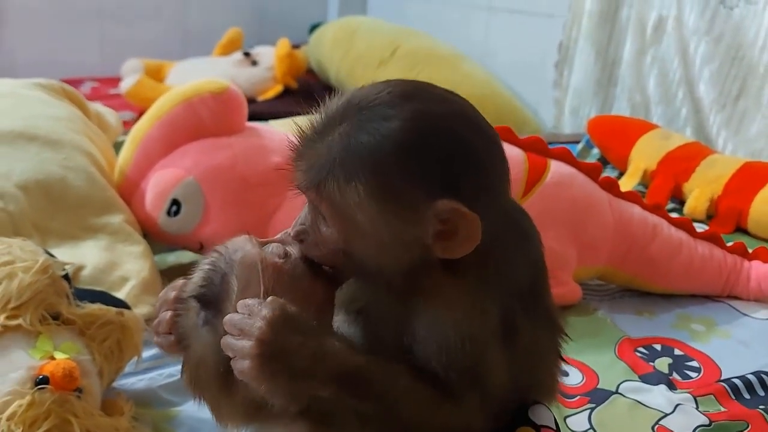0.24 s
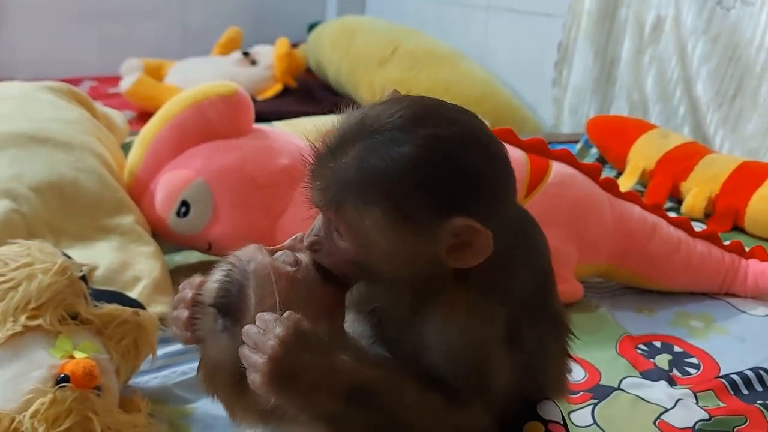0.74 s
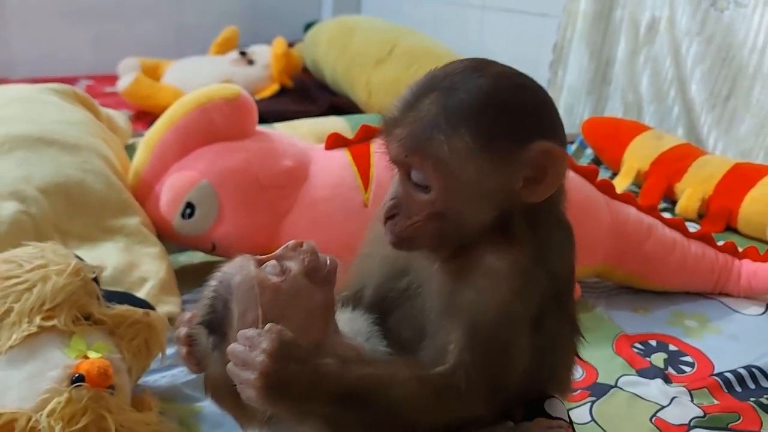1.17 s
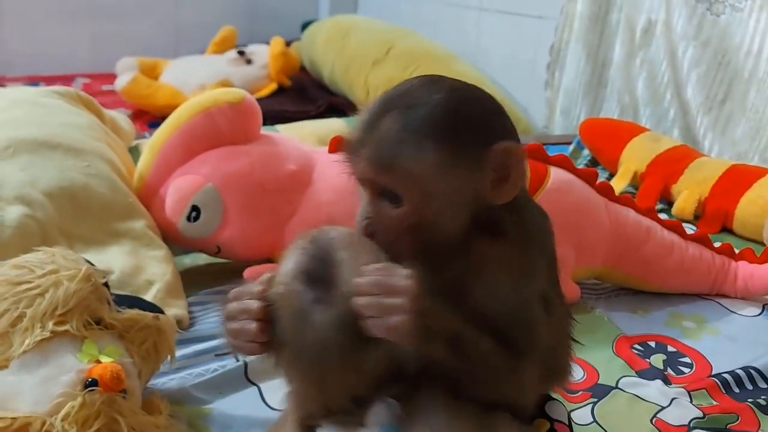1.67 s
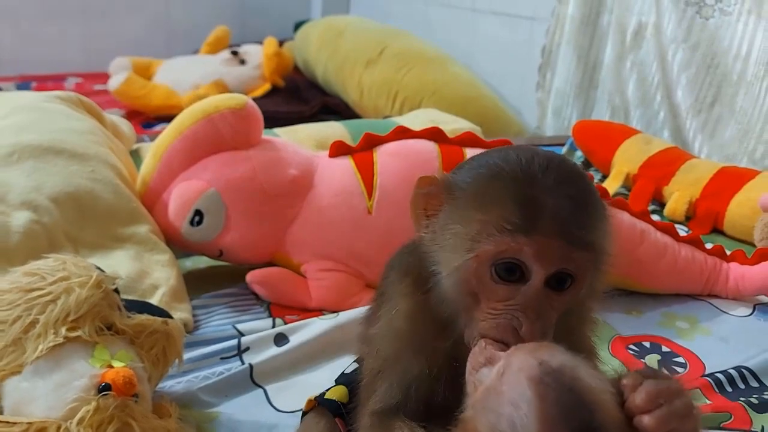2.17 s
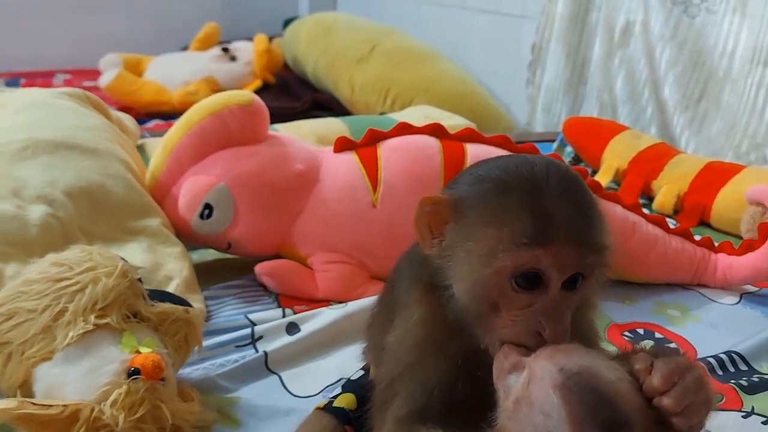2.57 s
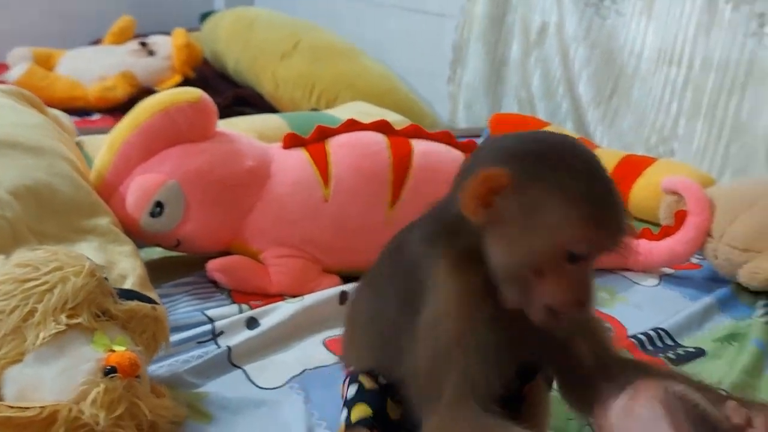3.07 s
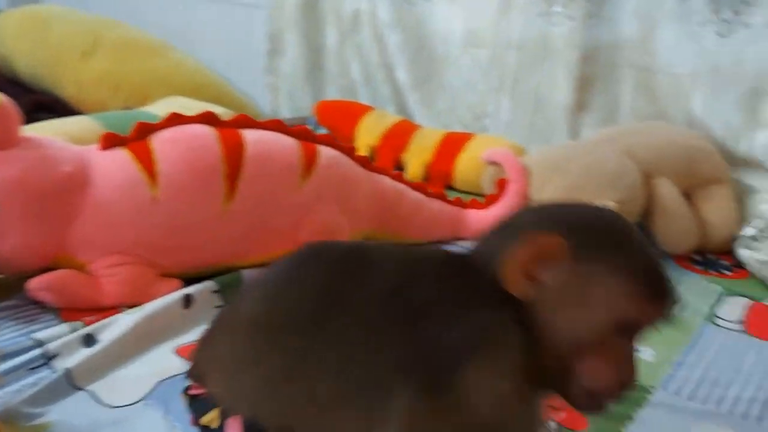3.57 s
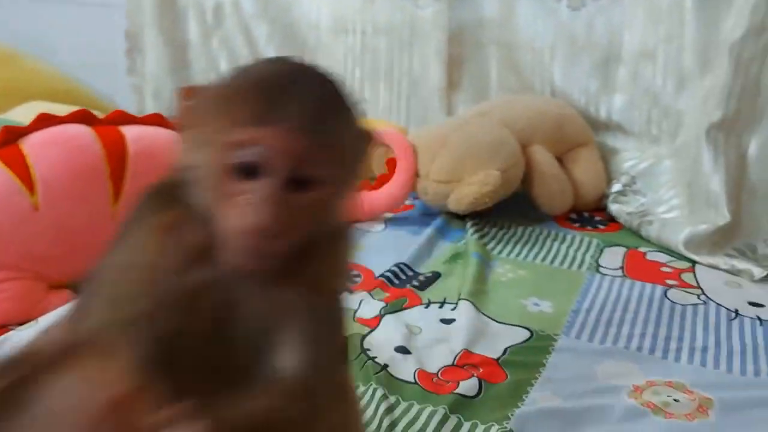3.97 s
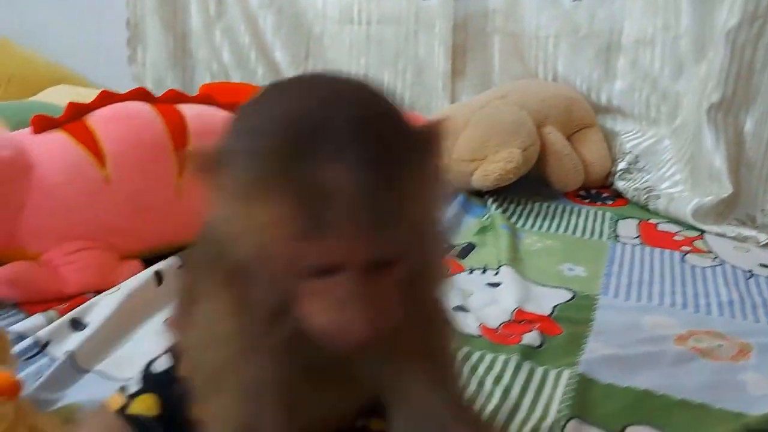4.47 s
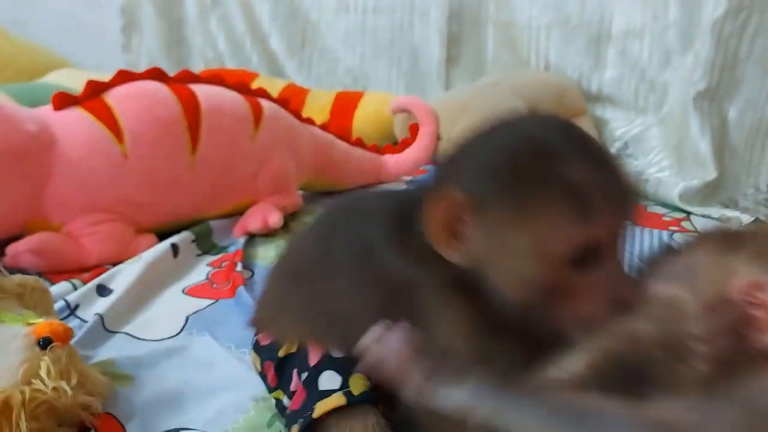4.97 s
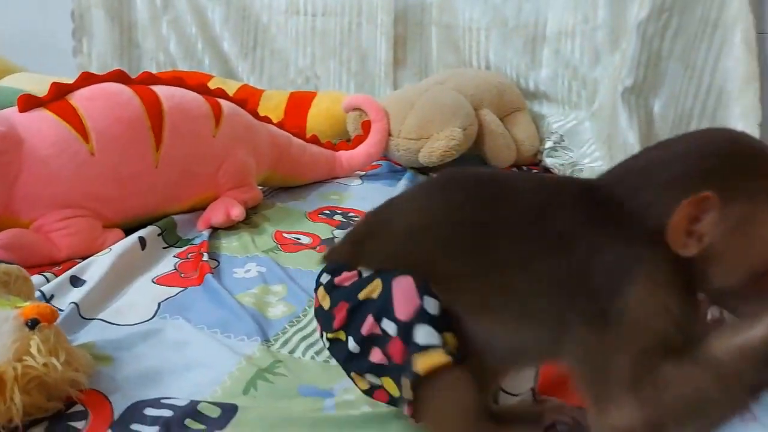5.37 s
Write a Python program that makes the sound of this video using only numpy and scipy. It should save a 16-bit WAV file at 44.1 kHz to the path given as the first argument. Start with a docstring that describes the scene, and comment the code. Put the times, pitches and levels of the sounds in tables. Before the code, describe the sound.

A small monkey scrambles on soft bedding: low, quickly dying thumps, fine cloth rustle and brief fur brushes over steady quiet air noise. Six separate piercing squeaks, gliding and breaking into rasp, appear from the middle onward, strongest near the end. Close stereo pickup in a small room; the left is bright and airy with short reflections, the right is dull and bass-heavy from the bed.

```python
"""Baby monkey on a bed

Small room, the camera resting on the mattress. A baby monkey gives six short, very high squeaks:
a few harmonics on clean gliding arcs that break into rasp, made by shaken pitch and bands of noise.
As it shifts about, coloured noise makes the rustle of cloth, and falling, decaying tones make the
thumps of hands and feet. The left microphone hears the air, with weak bounces and a short room tail;
the right one is muffled and picks up mainly the shaking bed. Each gets a trace of the other's sound."""
import sys
import numpy as np
from scipy import signal
from scipy.fft import rfft, irfft, next_fast_len
from scipy.io import wavfile
from scipy.ndimage import map_coordinates

SR = 44100
rng = np.random.default_rng(int(sys.argv[2]) if len(sys.argv) > 2 else 0)


def log_audio(samples):
    """Write samples as a 16-bit WAV file to the path given in sys.argv[1]."""
    # one column per channel
    frames = np.atleast_2d(samples).T
    # limit to full scale, then quantise
    limited = np.clip(frames, -1, 1)
    pcm = np.round(limited * 32767).astype(np.int16)
    wavfile.write(sys.argv[1], SR, pcm)


N = 247842  # length [samples]
TIME = np.arange(N) / SR


def amp(db):
    """Decibels to gain."""
    return 10 ** (np.asarray(db) / 20)


def unit(x):
    """Scale to rms 1."""
    return x / np.sqrt(np.mean(x ** 2) + 1e-20)


def along(points, hz, column=1):
    """One column of a table over frequency, on a log axis."""
    columns = np.transpose(points)
    return np.interp(np.log(hz + 1), np.log(columns[0] + 1), columns[column])


def level_over_time(rows):
    """Straight lines between the rows of a (time [s], level [dB]) table."""
    times, levels = np.transpose(rows)
    return np.interp(TIME, times, levels)


def wobble(rate, size):
    """A smooth random curve, rate knots a second."""
    knots = rng.standard_normal(int(size * rate / SR) + 4)
    return map_coordinates(knots, [np.arange(size) * rate / SR])


def filtered(x, response):
    """x times a response of frequency."""
    padded_size = next_fast_len(N + SR // 2)
    gain = response(np.fft.rfftfreq(padded_size, 1 / SR))
    return irfft(rfft(x, padded_size) * gain, padded_size)[..., :N]


def shaped(x, points):
    """x through a (frequency [Hz], gain [dB]) table."""
    return filtered(x, lambda hz: amp(along(points, hz)))


def noise(spectrum):
    """Coloured noise of rms 1."""
    return unit(shaped(rng.standard_normal(N), spectrum))


def add(track, s, x):
    """Mix x into the track at s seconds."""
    part = track[round(s * SR):][:len(x)]
    part += x[:len(part)]


def arch(length, roundness=0.27):
    """Progress 0-1 through a short sound, and its rounded swell."""
    u = np.linspace(0, 1, max(round(length * SR), 8))
    return u, np.abs(np.sin(np.pi * u)) ** roundness


# soft rush of the room, before soft_db: (time [s], level [dB])
ROOM_RUSH = [(0.0, -54), (1.69, -53), (2.08, -51.5), (2.47, -51.5), (2.6, -50), (3.88, -50), (4.98, -53.5),
             (5.62, -54)]
# fine rustle of the sheet, before fine_db: (time [s], level [dB])
CLOTH_RUSTLE = [(0.0, -76), (1.52, -66), (1.71, -67.5), (2.8, -71.5), (3.22, -63.5), (3.57, -66),
                (3.88, -64.5), (4.41, -65.5), (4.54, -72), (5.62, -71.5)]
# colour of the rush: (frequency [Hz], relative level [dB])
AIR_COLOUR = [(20, -1), (45, 3.5), (170, 2), (280, 8), (450, 2), (700, 0.5), (1800, 1), (2800, -5.5),
              (4500, -18), (7000, -28), (14000, -52), (17000, -42)]
# fine hiss of fibres, in the sheet and in fur: (frequency [Hz], relative level [dB])
FIBRE_COLOUR = [(1500, -36), (4500, -10.5), (6000, -12.5), (8200, -5.5), (9300, 8), (11500, 3.5),
                (13500, -1), (16000, -16.5)]


def bedding(soft_db=8.0, fine_db=6):
    """The soft rush of the room and the fine rustle of the sheet, as two slowly varying noises."""
    rush_db = level_over_time(ROOM_RUSH) + soft_db + 0.4 * wobble(21, N)
    rustle_db = level_over_time(CLOTH_RUSTLE) + fine_db
    rustle_db = rustle_db + 0.6 * wobble(40, N) + 1.0 * wobble(500, N)
    return amp(rush_db) * noise(AIR_COLOUR) + amp(rustle_db) * noise(FIBRE_COLOUR)


BED_HZ = 64  # the slow ring of the mattress
# mattress shaken by shifting weight, before shake_db: (time [s], level [dB])
WEIGHT_SHIFTS = [(0.0, -55), (0.74, -53.5), (0.85, -57.5), (2.3, -54.5), (2.64, -47), (2.91, -47),
                 (3.19, -38.5), (3.71, -42), (4.18, -40.5), (4.68, -42), (4.79, -54.5), (5.23, -42),
                 (5.4, -48), (5.62, -52)]
# colour of that shaking: (frequency [Hz], relative level [dB])
SHAKE_COLOUR = [(15, -19), (30, -9), (45, 2), (62, 6), (108, -2), (170, -10), (280, -26.5), (450, -33.5),
                (700, -49.5), (1500, -61), (4000, -72)]
# hands and feet on the mattress; a limb that stays down damps the ring:
# (time [s], level before padding [dB], first pitch [Hz], 60 dB decay time [s])
LIMB_THUMPS = [(1.137, -28.5, 396, 0.11), (1.157, -26, 450, 0.11), (1.195, -14, 110, 0.1),
               (1.755, -16.5, 215, 0.082), (2.480, -20.5, 203, 0.088), (2.55, -13.5, 121, .17),
               (2.626, -7, 152, 0.038), (2.665, -13.5, 400, 0.043), (2.686, -12, 295, 0.036),
               (3.007, -10, 334, 0.11), (3.061, -5.5, 175, 0.11), (3.209, -14.5, 220, 0.034),
               (3.233, -13.5, 348, 0.036), (3.296, -14, 306, 0.098), (3.386, -18, 420, 0.052),
               (3.456, -10, 130, 0.043), (3.629, -9.5, 120, 0.07), (3.936, -14.5, 130, .04),
               (3.981, -13, 356, .03), (4.006, -10.5, 181, 0.061), (4.09, -9, 346, 0.04),
               (4.169, -7, 352, 0.064), (4.198, -11, 384, 0.061), (4.373, -16.5, 111, 0.17),
               (4.455, -19, 90.5, 0.19), (4.799, -9, 262, 0.2), (4.834, -6.5, 226, .14),
               (4.968, -13.5, 198, 0.028), (5.077, -19.5, 450, 0.035), (5.089, -7.5, 190, 0.13),
               (5.156, -9.5, 320, 0.17), (5.207, -9, 130, 0.049), (5.3, -11.5, 376, 0.096)]
# the soft mattress colours each blow: (frequency [Hz], gain [dB])
PADDING_GAIN = [(100, 1), (200, -3), (320, 1.5), (450, -3), (700, -6), (2000, 3.5)]


def mattress(glide_s=0.0034, rise_cycles=0.74, shake_db=8.0):
    """Fast ripples arrive first, so each thump falls to the bed's slow ring; shifting weight shakes it."""
    thumps = np.zeros(N)
    t = np.arange(SR // 4) / SR
    for s, db, first_hz, t60 in LIMB_THUMPS:
        pitch = BED_HZ + (first_hz - BED_HZ) * np.exp(-t / glide_s)
        rise = 1 - np.exp(-t * first_hz / rise_cycles)
        decay = amp(db - 60 * t / t60)
        add(thumps, s, -rise * decay * np.sin(2 * np.pi * np.cumsum(pitch) / SR))
    shaking_db = level_over_time(WEIGHT_SHIFTS) + shake_db + wobble(23, N)
    return shaped(thumps, PADDING_GAIN) + amp(shaking_db) * noise(SHAKE_COLOUR)


# brief brushes of fur and cloth, and the monkey's short hissy puffs near 1.86 and 2.07 s, dry: # (time [s],
# length [s], fine level [dB], coarse level [dB])
BRUSHES_AND_PUFFS = [(.852, .0054, -51, -62), (1.143, 0.0064, -50, -60), (1.157, .007, -50.5, -55),
                     (1.786, .058, -64, -46.5), (1.861, 0.033, -41.5, -43.5), (2.072, 0.026, -38, -47),
                     (2.967, 0.0186, -39.5, -44.5), (3.660, .023, -43.5, -43), (3.726, .05, -34, -63),
                     (4.138, 0.0049, -36, -37), (4.149, .004, -33.5, -50), (4.828, .032, -48.5, -36.5)]
# coarse rub of the woven sheet: (frequency [Hz], relative level [dB])
WEAVE_COLOUR = [(200, 0.5), (500, 2.5), (1000, -0.5), (2200, 0.5), (3200, -6), (5000, -5), (7000, -17.5),
                (12000, -32.5)]


def brushes():
    """Short strokes of noise: fur hisses finely and grainily, the sheet rubs more coarsely."""
    fine, coarse = np.zeros((2, N))
    for s, length, fine_db, coarse_db in BRUSHES_AND_PUFFS:
        swell = arch(length)[1]
        add(fine, s, amp(fine_db) * swell)
        add(coarse, s, amp(coarse_db) * swell)
    grainy_hiss = unit(noise(FIBRE_COLOUR) * amp(2.6 * wobble(570, N)))
    return fine * grainy_hiss + coarse * noise(WEAVE_COLOUR)


def resonance(offset_hz, width_hz, skirt_db):
    """Gain of a throat or mouth resonance at some distance from its centre."""
    return 1 / (1 + (offset_hz / width_hz) ** 2) + amp(skirt_db)


def turbulence(size, centre_hz, width_hz, skirt_db):
    """Rough breath: a band of noise of rms 1 around a resonance."""
    offset = np.fft.fftfreq(size, 1 / SR)
    shape = resonance(offset, width_hz, skirt_db) * (np.abs(offset) < 0.7 * centre_hz)
    white = rng.standard_normal(size) + 1j * rng.standard_normal(size)
    band = np.fft.ifft(np.fft.fft(white) * shape)
    return unit(np.real(band * np.exp(2j * np.pi * centre_hz * np.arange(size) / SR)))


LONGEST = SR // 10  # room for one note, release included [samples]
ATTACK_S, RELEASE_S = 0.003, 0.0017  # a clear note starts and stops almost at once
HOARSE_ATTACK_S, HOARSE_RELEASE_S = 0.0036, 0.012  # extra for a fully hoarse note
SAG_DB = 2.6  # the level sinks through each note as the pressure is spent
SWELL_DB = 1  # height of the arch laid over that sag


def squeak(note, jitter=0.018, flutter_db=-1.5, throat_hz=4300, shimmer_db=3.0, buzz_hz=850, buzz=0.25):
    """Tiny vocal folds sound a few harmonics along an arc; rasp shakes their pitch and adds hiss."""
    length, start_hz, middle_hz, end_hz, low_db, high_db, mouth_hz, rasp = note
    rasp = np.clip(rasp, 0, 1)
    fray = rasp ** 2
    t = np.arange(LONGEST) / SR
    size, u = len(t), np.minimum(t / length, 1)

    attack = ATTACK_S + HOARSE_ATTACK_S * fray
    release = RELEASE_S + HOARSE_RELEASE_S * fray
    effort_db = SAG_DB * (0.5 - u) + SWELL_DB * (np.sin(np.pi * u) - 2 / np.pi)
    envelope = np.minimum(t / attack, 1) * np.clip(1 - (t - length) / release, 0, 1) * amp(effort_db)

    pitch = np.polyval(np.polyfit([0, 0.5, 1], [start_hz, middle_hz, end_hz], 2), u)
    pitch = pitch * (1 + jitter * (rasp + 0.28) * (wobble(1400, size) + wobble(305.6, size)))
    phase = 2 * np.pi * np.cumsum(pitch) / SR

    # the mouth picks out some overtones; rasp trades them for hiss at the same resonance
    k = np.arange(2, 9)[:, None]
    gains = resonance(k * pitch - mouth_hz, width_hz=1400, skirt_db=-44.5) * (k * pitch < SR / 2)
    overtones = np.sum(gains * np.sin(k * phase), axis=0) / np.linalg.norm(gains, axis=0)
    hiss = turbulence(size, mouth_hz, width_hz=1400, skirt_db=-20)
    upper = np.sqrt(2 * (1 - rasp)) * overtones + np.sqrt(rasp) * hiss

    # the fundamental trembles, and with rasp frays into a band around the throat resonance
    trembling = np.sin(phase) * amp(shimmer_db * wobble(360, size))
    hoarse = turbulence(size, throat_hz, width_hz=280, skirt_db=-17.0)
    lower = np.sqrt(2 - fray) * trembling + fray * hoarse

    # a slower vibration of the strained folds puts sidebands around every harmonic
    slow_phase = 2 * np.pi * np.cumsum(buzz_hz * (1 + 0.14 * wobble(150, size))) / SR
    sidebands = 1 + buzz * np.sqrt(rasp * (1 - rasp)) * 2 * np.sin(slow_phase)
    flutter = sidebands * amp(flutter_db * rasp * wobble(550, size))
    return envelope * flutter * (amp(low_db) * lower + amp(high_db) * upper)


# each squeak is a run of short notes; at a break the voice jumps in pitch or turns hoarse; levels are dry:
# (time [s], length [s], start pitch [Hz], middle pitch [Hz], end pitch [Hz],
#  fundamental level [dB], overtone level [dB], mouth resonance [Hz], rasp [0-1])
SQUEAK_NOTES = [ (2.4, .004, 3500, 3570, 3400, -41, -43, 9500, .3),
                (2.409, .007, 3900, 3800, 3720, -40, -22.5, 9830, .01),
                (2.413, 0.013, 3780, 3600, 3210, -29, -34, 9600, .3),
                (2.424, .022, 3660, 3650, 3500, -42, -33.5, 10500, .75),
                (3.301, .004, 5000, 4700, 4520, -32, -31, 9800, 0.12),
                (3.307, 0.028, 4570, 4600, 4550, -42, -54, 9900, .95),
                (3.669, .017, 2090, 2120, 2020, -47, -30, 11400, .3),
                (3.687, .042, 2040, 1850, 1780, -59, -32, 11240, 0.94),
                (3.726, .037, 4200, 3946, 3050, -39.5, -24.5, 7450, .2),
                (3.763, .03, 2970, 3300, 3380, -46.5, -36, 7700, 0.54),
                (4.006, .013, 3770, 3800, 3850, -32, -39.5, 7400, 0.5),
                (4.019, .008, 2930, 3280, 3340, -31, -18.5, 9800, 0.4),
                (4.029, .013, 3420, 3353, 3850, -32.5, -12.5, 10400, .03),
                (4.044, .017, 4140, 4310, 4290, -26, -27.5, 9100, 0.23),
                (4.057, .016, 4280, 4320, 4250, -33.5, -31, 10200, 0.75),
                (4.366, .029, 2300, 2670, 3330, -41, -22.5, 12700, 0.6),
                (4.394, .022, 3350, 3700, 3460, -31, -25.5, 11900, 0.12),
                (4.416, .018, 4650, 4650, 4900, -32, -26, 11900, .8),
                (4.432, .013, 5200, 5220, 5200, -24.5, -13.5, 10600, 0.18),
                (4.446, .014, 5140, 4680, 4400, -30.5, -23, 9700, .35),
                (4.459, .022, 5020, 5000, 4950, -27.5, -36, 9300, .5),
                (4.786, .014, 3700, 3630, 3750, -58, -34.5, 9650, .9),
                (4.8, .020, 3740, 3620, 4030, -36.5, -24.5, 9400, .25),
                (4.818, .015, 4300, 4480, 4310, -28, -12.5, 10700, .02),
                (4.831, .013, 3440, 3100, 3260, -49.5, -15, 10500, .5),
                (4.846, .016, 4034, 4830, 4780, -22, -11.5, 9550, .08),
                (4.86, .015, 5440, 4600, 3580, -24.5, -20, 9200, .7)]
# brief pure whistles, a second voice in the throat on its own pitch, dry:
# (time [s], length [s], start pitch [Hz], end pitch [Hz], level [dB])
THROAT_WHISTLES = [(2.408, 0.0034, 4310, 3980, -22.5), (2.953, .012, 3420, 3100, -47.5),
                   (3.668, .03, 4200, 3960, -46), (3.669, .015, 6400, 6150, -40),
                   (3.711, 0.017, 5520, 5140, -32.5), (3.718, .07, 4160, 4100, -44.5),
                   (4.008, .014, 5500, 6700, -39), (4.018, 0.011, 4480, 5450, -34),
                   (4.022, 0.011, 11600, 11900, -19.5), (4.369, 0.0063, 4380, 4230, -23.5),
                   (4.378, 0.012, 3890, 4660, -19.5), (4.386, 0.021, 4640, 5330, -33),
                   (4.389, .015, 11030, 12700, -21), (4.437, .011, 13300, 12500, -17.5),
                   (4.445, 0.039, 5305, 5010, -28.5), (4.801, 0.0074, 9440, 9650, -13.5),
                   (4.838, 0.0069, 9610, 9800, -13), (4.854, .010, 4874, 5080, -17),
                   (4.862, .006, 5340, 5770, -17.5), (4.866, .016, 8570, 7530, -29.5)]


def monkey(waver=0.009, shimmer_db=2):
    """The squeaks, and short gliding whistles from a second pitch in the throat."""
    voice = np.zeros(N)
    for s, *note in SQUEAK_NOTES:
        add(voice, s, squeak(note))
    for s, length, start_hz, end_hz, db in THROAT_WHISTLES:
        u, swell = arch(min(length, LONGEST / SR))
        glide = start_hz + (end_hz - start_hz) * u
        pitch = glide * (1 + waver * wobble(680, LONGEST)[:len(u)])
        swell = swell * amp(shimmer_db * wobble(400, LONGEST)[:len(u)])
        tone = np.sin(2 * np.pi * np.cumsum(pitch) / SR)
        add(voice, s, np.sqrt(2) * amp(db) * swell * tone)
    return voice


def nearby(x, bounce_db=-19, count=6):
    """Weak early bounces off bed and wall beat against the gliding pitch."""
    bounces = np.zeros(N)
    for k, delay_s in enumerate(rng.uniform(0.002, 0.017, count)):
        bounces += (-1) ** k * np.pad(x, (round(delay_s * SR), 0))[:N]
    return x + amp(bounce_db) * bounces


# decay of the small room: (frequency [Hz], 60 dB decay time [s], relative level [dB])
ROOM_DECAY = [(300, 0.35, -1), (3000, 0.57, -3), (4600, 0.31, 5), (6500, 0.39, 0.5), (10000, 0.28, -4),
              (15030, 0.51, -6.5)]


def room(x, wet_db=-13.5, wall_db=5, wall_s=0.043, wall_spread_s=0.0099):
    """A short diffuse tail of decaying noise, with a cluster of stronger echoes from the far wall."""
    hz, t, grid = signal.stft(rng.standard_normal(SR // 2), SR, nperseg=256)
    t60 = along(ROOM_DECAY, hz)[:, None]
    decay = amp(along(ROOM_DECAY, hz, column=2)[:, None] - 60 * t / t60)
    wall = amp(wall_db * np.exp(-((t - wall_s) / wall_spread_s) ** 2))
    build_up = 1 - np.exp(-t / 0.0028)
    tail = signal.istft(grid * decay * wall * build_up, SR, nperseg=256)[1]
    return amp(wet_db) * signal.fftconvolve(x, tail / np.linalg.norm(tail))[:N]


# microphone colour on voice and brushes: (frequency [Hz], gain [dB])
MICROPHONE_COLOUR = [(3000, 3), (5400, -2), (6000, -0.5), (6800, 1), (7600, -1), (8200, -3.5), (8900, 1.5),
                     (13000, -1), (15500, 2), (16300, -22)]


def scene():
    """Airborne sound on the left, the shaking bed on the right, and a trace of each in the other."""
    bed_and_room = bedding()
    bed = mattress()
    near = nearby(monkey()) + brushes()
    air = shaped(near + room(near), MICROPHONE_COLOUR) + bed_and_room
    # leaks between the microphones: (frequency [Hz], gain [dB])
    muffled = shaped(air, [(300, -42), (1000, -46.5), (4500, -48.0), (10000, -64)])
    knock = shaped(bed, [(60, -45), (150, -32), (400, -21)])
    faint_hiss = amp(-79.0) * rng.standard_normal(N)
    return np.array([air + knock, bed + muffled + faint_hiss])


TOP_HZ = 16300  # band limit of the camera


def record(dry):
    """The camera clips at full scale, then keeps nothing from its band limit up."""
    return filtered(np.clip(dry, -1, 1), lambda hz: hz < TOP_HZ)


dry = scene()
out = record(dry)
log_audio(out)
```